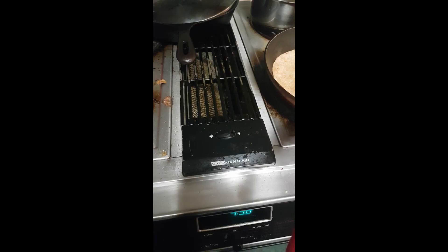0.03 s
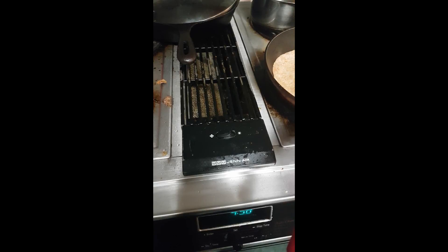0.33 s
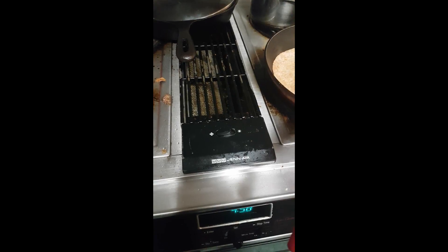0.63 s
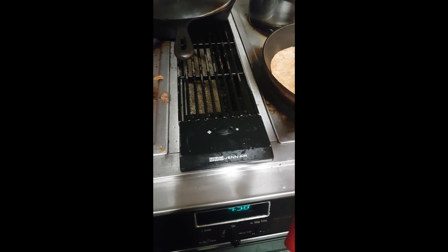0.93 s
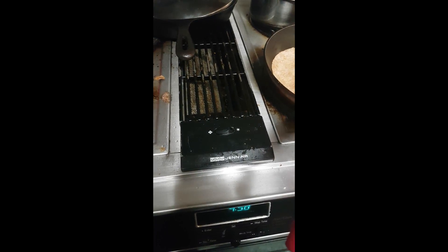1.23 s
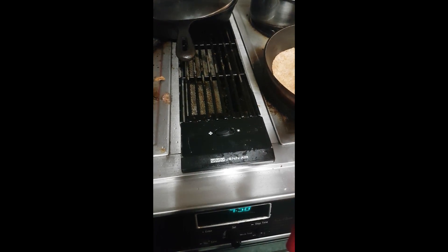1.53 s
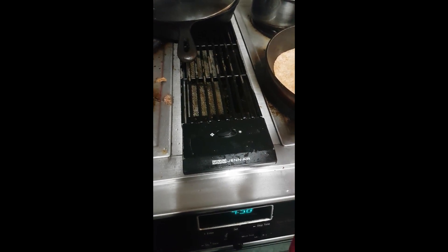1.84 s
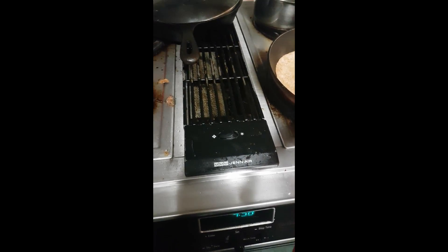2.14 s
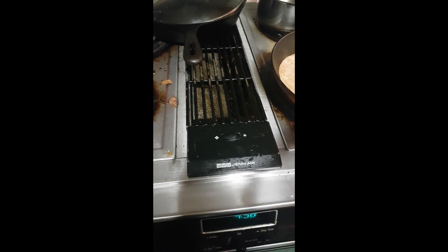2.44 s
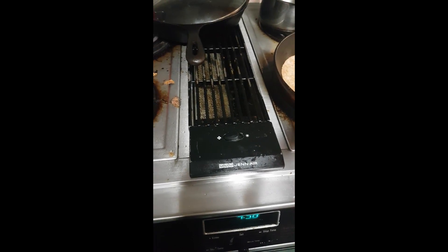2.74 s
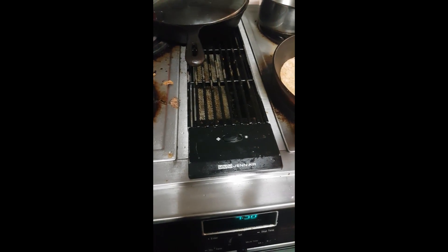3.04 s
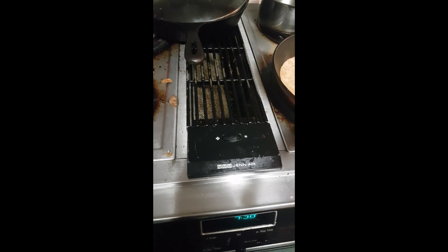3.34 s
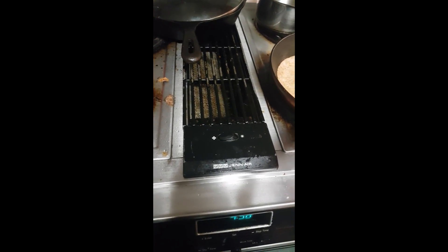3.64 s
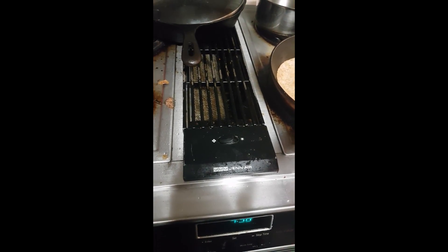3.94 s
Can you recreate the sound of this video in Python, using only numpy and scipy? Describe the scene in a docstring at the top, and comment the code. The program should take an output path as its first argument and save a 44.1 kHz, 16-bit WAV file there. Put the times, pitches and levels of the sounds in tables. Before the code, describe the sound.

Rhythmic metallic knocking and scraping from a loose extractor fan, with humming and rushing air.

```python
"""A kitchen stove, heard from close above the grille of its faulty extractor fan.
About three times a second the loose wheel swings into the sheet-metal housing in the same limping
figure: a bump, a sharp tick, a scrape, then a heavy knock that chatters out. Each impact excites free
vibration: a thump from the housing's low modes, a clatter from the panels, a sizzle from the grille.
Underneath, the motor hums at harmonics of its shaft rate and draws a rush of air."""
import sys
import numpy as np
from scipy.fft import rfft, irfft, next_fast_len
from scipy.io import wavfile
from scipy.ndimage import map_coordinates

SR = 44100
rng = np.random.default_rng(int(sys.argv[2]) if len(sys.argv) > 2 else 0)


def bounce(signal):
    """Save signal as a 16-bit WAV file at the path given by the first command-line argument."""
    frames = np.transpose(np.atleast_2d(signal))
    limited = np.clip(frames, -1, 1)
    pcm = np.round(limited * 32767).astype(np.int16)
    wavfile.write(sys.argv[1], SR, pcm)


N = 176400
RING_SAMPLES = 16384


def wheel_impacts(modes, panels, grille, first_knock_s=-0.02662, period_s=0.31782):
    """Periodic impact excitation: each swing strikes the same spots, so each keeps part of its timbre."""
    # strength of successive swings: knock_db, scrape_db
    swings = [(-1.5, 1), (0, -2.5), (-0.4, 1), (0.2, 1.5), (0.45, 0), (-1, 0), (-1, -0.5), (0.4, 2),
              (0, 1.5), (-.5, -1.5), (0.3, 0.5), (0.15, 1.5), (-0.5, -1.5), (0, 0)]
    # contacts within a swing, timed from the heavy knock: offset_s, thump_db, clatter_db, sizzle_db
    contacts = [(-.142, -19, -35, -51.5), (-.0505, -18.5, -31.5, -47), (-.037, -14.5, -27.5, -44),
                (0, -16, -23, -34), (0.0125, -14.5, -29, -37.5), (0.0346, -18, -33.5, -45),
                (0.0555, -14, -33, -57), (.0785, -18.5, -40.5, -58)]
    out = np.zeros((2, N))
    for offset_s, thump_db, clatter_db, sizzle_db in contacts:
        own_clatter, own_sizzle = panels(), grille()
        for k, (knock_db, scrape_db) in enumerate(swings):
            clatter = amp(clatter_db) * blend(own_clatter, panels(), share=0.63)
            sizzle = amp(sizzle_db) * blend(own_sizzle, grille(), share=0.1)
            thump = amp(thump_db) * housing_thump(modes)
            blow = thump + amp(0.35 * rng.standard_normal()) * (clatter + sizzle)
            swing_db = scrape_db if offset_s < -0.02 else knock_db
            add(out, first_knock_s + k * period_s + offset_s, amp(swing_db) * blow)
    return out


def glancing_ticks(modes, panels, grille, damping_s=0.06, thump_over_clatter_db=6.5):
    """Damped transients: a glancing touch is short and bright, with a clank when it bites harder."""
    # glancing touches, different on each swing: start_s, sizzle_db, clatter_db
    touches = [(0.081, -52, -31.5), (0.188, -41.5, -46), (.507, -41, -31), (.824, -39.5, -34),
               (1.102, -57, -47), (1.141, -34.5, -30), (1.459, -36, -22.5), (1.617, -49, -26.5),
               (1.671, -43, -29.5), (1.735, -58, -32.5), (1.778, -39, -33.5), (2.057, -62, -50),
               (2.095, -36, -24.5), (2.413, -37.5, -22.5), (2.733, -40.5, -41.5), (3.051, -40.5, -33),
               (3.365, -35.5, -25.5), (3.687, -40, -38)]
    out = np.zeros((2, N))
    damping = np.exp(-np.arange(RING_SAMPLES) / SR / damping_s)
    for start_s, sizzle_db, clatter_db in touches:
        sizzle = amp(sizzle_db) * grille()
        clank = amp(clatter_db) * (panels() + amp(thump_over_clatter_db) * housing_thump(modes))
        add(out, start_s, (sizzle + clank) * damping)
    return out


def housing_modes(attack_s=0.00098):
    """Normal modes: each rings as a damped sine, opposite in sign to its neighbours."""
    # low modes of the housing: pitch_hz, level_db, t60_s
    resonances = [(115.64, -11.5, 0.66), (142.56, -14.5, 0.44), (146.6, -18, 0.36), (192.5, 5, 0.15),
                  (197.8, -2, 0.31), (242.9, 4, 0.15), (243.7, 1.53, 0.22), (289.8, -21, 0.55),
                  (311.7, -20, 0.5), (454, -18.5, 0.28), (578, -23, 0.24), (717, -40.5, 0.24)]
    t = np.arange(RING_SAMPLES) / SR
    pitch_hz, level_db, t60_s = np.transpose(resonances)[:, :, None]
    polarity = (-1) ** np.arange(len(pitch_hz))[:, None]
    envelope = amp(level_db - 60 * t / t60_s) * (1 - np.exp(-t / attack_s))
    return polarity * envelope * np.sin(2 * np.pi * pitch_hz * t)


def housing_thump(modes, scatter_db=0.6, width=0.042):
    """Modal superposition: the weights vary a little from blow to blow and from ear to ear."""
    gains = amp(scatter_db * rng.standard_normal(len(modes)))
    spread = width * (-1) ** np.arange(len(modes))
    return np.array([gains * (1 + spread), gains * (1 - spread)]) @ modes


def dense_ring(spectrum, attack_s, crack_db, crack_s=0.0059, t60_s=0.25, ripple_db=3, ripple_hz=129.9):
    """Modal overlap: crowded modes merge into decaying noise. Returns a maker of such rings."""
    t = np.arange(RING_SAMPLES) / SR
    gains = sheet_colour(spectrum, RING_SAMPLES)
    crack = 1 + amp(crack_db) * np.exp(-t / crack_s)
    envelope = amp(-60 * t / t60_s) * (1 - np.exp(-t / attack_s)) * crack
    knots = np.fft.rfftfreq(RING_SAMPLES, 1 / SR) / ripple_hz

    def ring():
        # finer resonances, drawn anew for each blow
        ripple = map_coordinates(rng.standard_normal(size=512), [knots], order=1)
        return envelope * noise(gains * amp(ripple_db * ripple))
    return ring


def sheet_colour(spectrum, size):
    """Resonance: the sheet metal adds peaks to a spectrum. Returns mid and side gains per FFT bin."""
    # resonances of the sheet metal: centre_hz, width_hz, lift_db
    peaks = [(885, 59, 5), (1278, 32, 6.5), (1562, 62, 8), (1745, 37, 5.5), (2110, 72, 10), (2924, 61, 5.5),
             (3280, 45, 4.5), (3840, 24, 3), (4900, 160, 2.5)]
    # likeness of left and right, low in the treble: frequency_hz, correlation
    likeness = [(60, 0.42), (180, 0.47), (320, 1), (500, -.05), (1200, 0.16), (2500, -0.17), (5000, -0.019)]
    hz = np.fft.rfftfreq(size, 1 / SR)
    lift_db = sum(db / (1 + (2 * (hz - centre) / width) ** 2) for centre, width, db in peaks)
    angle = np.arccos(np.clip(along(likeness, hz), -1, 1)) / 2
    return amp(along(spectrum, hz) + lift_db) * [np.cos(angle), np.sin(angle)]


def motor_hum(shaft_hz=28.32, waver_db=2, drift_rad=0.23):
    """Shaft harmonics: tones at multiples of the rotation rate, unsteady in level and phase."""
    # partials of the hum: shaft_order, level_db
    harmonics = [(2, -51.5), (3, -48), (4, -35.5), (5, -41)]
    t = np.arange(N) / SR
    hum = np.zeros(N)
    for order, level_db in harmonics:
        peak = np.sqrt(2) * amp(level_db + waver_db * wobble(5.06))
        phase = 2 * np.pi * (order * shaft_hz * t + rng.random()) + drift_rad * wobble(2.4)
        hum += peak * np.sin(phase)
    return hum


def air_rush(level_db=-35.5):
    """Flow noise: the drawn air makes a steady broadband rush."""
    # relative spectrum of the airflow: frequency_hz, density_db
    airflow = [(25, -25), (45, -9), (70, -3), (100, -7), (130, -10.5), (200, -3), (330, -3.5), (800, -9.5),
               (1500, -17.5), (1900, -22.5), (3200, -25.5), (7100, -41), (10000, -36.5), (15500, -43.5)]
    return amp(level_db) * noise(sheet_colour(airflow, N))


def amp(db):
    """Decibels to amplitude ratio."""
    return 10 ** (np.asarray(db) / 20)


def along(points, hz):
    """Interpolate (frequency_hz, value) points on a logarithmic frequency axis."""
    frequencies, values = np.transpose(points)
    return np.interp(np.log(hz + 1), np.log(frequencies + 1), values)


def blend(same, fresh, share):
    """Incoherent addition: the repeating part takes this share of a constant power."""
    return np.sqrt(share) * same + np.sqrt(1 - share) * fresh


def filtered(x, response):
    """Linear filtering: multiply the spectrum by a frequency response."""
    n = x.shape[-1]
    padded = next_fast_len(n + 2048)
    return irfft(rfft(x, padded) * response(np.fft.rfftfreq(padded, 1 / SR)), padded)[..., :n]


def wobble(rate_hz):
    """Random modulation: a smooth curve through rate_hz knots a second."""
    knots = rng.standard_normal(int(N * rate_hz / SR) + 4)
    return map_coordinates(knots, [np.arange(N) * rate_hz / SR])


def noise(gains):
    """Gaussian stereo noise of rms 1, shaped by mid and side gains."""
    mid, side = irfft(gains * (rng.standard_normal(gains.shape) + 1j * rng.standard_normal(gains.shape)))
    stereo = np.array([mid + side, mid - side])
    return stereo / np.sqrt(np.mean(stereo ** 2) + 1e-20)


def add(out, start_s, sound):
    """Superpose a sound on the output at start_s."""
    start = round(start_s * SR)
    first, last = max(start, 0), min(start + sound.shape[-1], N)
    if last > first:
        out[:, first:last] += sound[:, first - start:last - start]


def scene():
    """Superposition of impacts, hum and air, with a level difference between the ears."""
    # relative spectrum of the ringing panels: frequency_hz, density_db
    clatter = [(60, -24), (140, -4), (290, 3.5), (370, -2.5), (520, -1), (660, -3), (830, -1.5), (1130, -4),
               (1450, -5), (1900, -12.5), (2700, -12.5), (4800, -23.5), (7000, -29.5), (16000, -73)]
    # relative spectrum of the loose grille: frequency_hz, density_db
    sizzle = [(800, -23), (2000, -1), (3200, 1.5), (4800, 1), (5800, -0.5), (7300, -4.5), (8800, 3.5),
              (12000, 0), (14500, -2), (16000, -7.5)]
    # stereo balance: frequency_hz, left_minus_right_db
    balance = [(40, 0), (80, -5), (140, 0.2), (290, 0.8), (640, -2.5), (1410, -1), (2600, .3), (5500, -1.7),
               (9000, 1.5), (15000, 5)]
    modes = housing_modes()
    panels = dense_ring(clatter, attack_s=0.0016, crack_db=-3)
    grille = dense_ring(sizzle, attack_s=0.0019, crack_db=-2.5)
    rattle = wheel_impacts(modes, panels, grille) + glancing_ticks(modes, panels, grille)
    mix = rattle + motor_hum() + air_rush()
    return filtered(mix, lambda hz: amp(along(balance, hz) / 2 * np.array([[1], [-1]])))


def record(dry, start_s=0.078, cutoff_hz=15800):
    """Gating and band limiting: a moment of silence, then everything below the cutoff."""
    return filtered(dry * (np.arange(N) >= start_s * SR), lambda hz: hz < cutoff_hz)


dry = scene()
out = record(dry)
bounce(out)
```